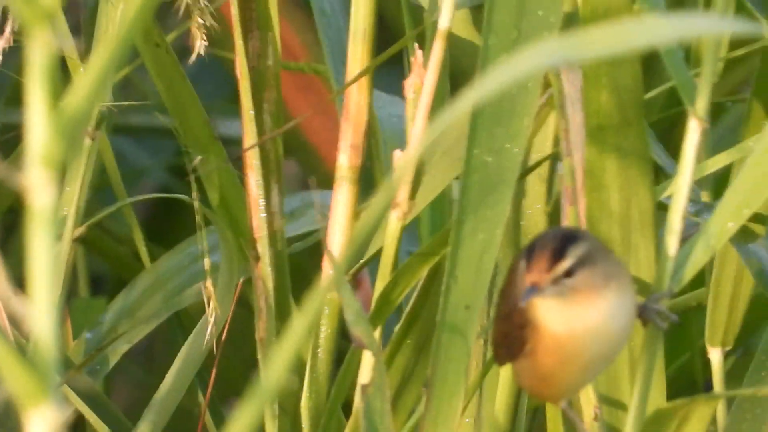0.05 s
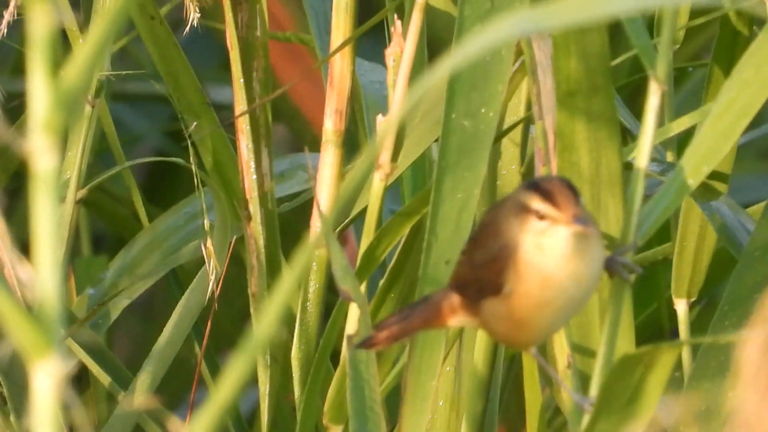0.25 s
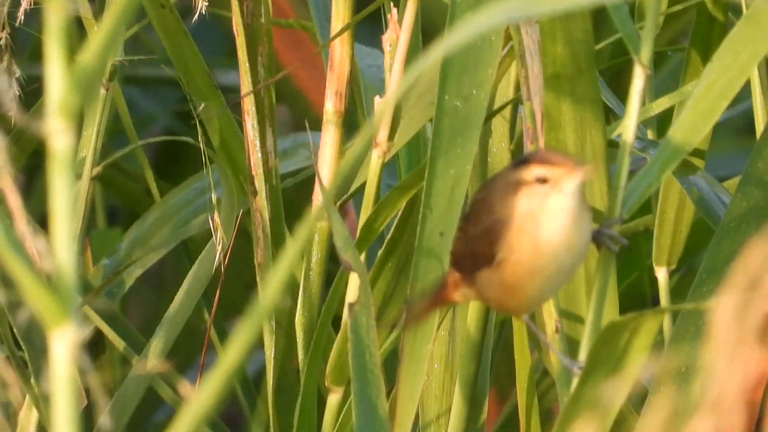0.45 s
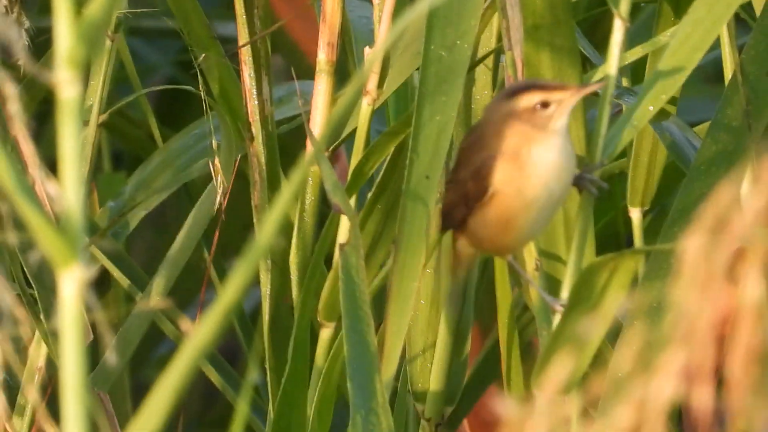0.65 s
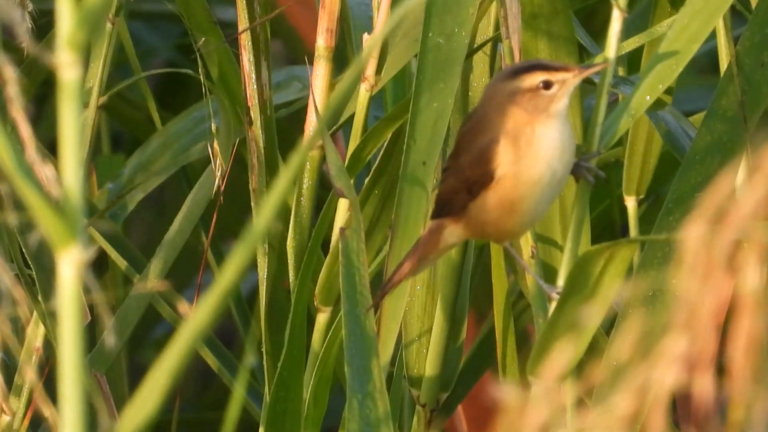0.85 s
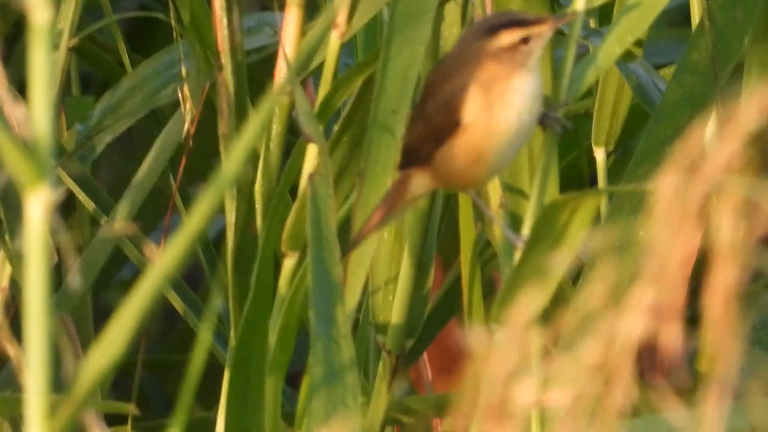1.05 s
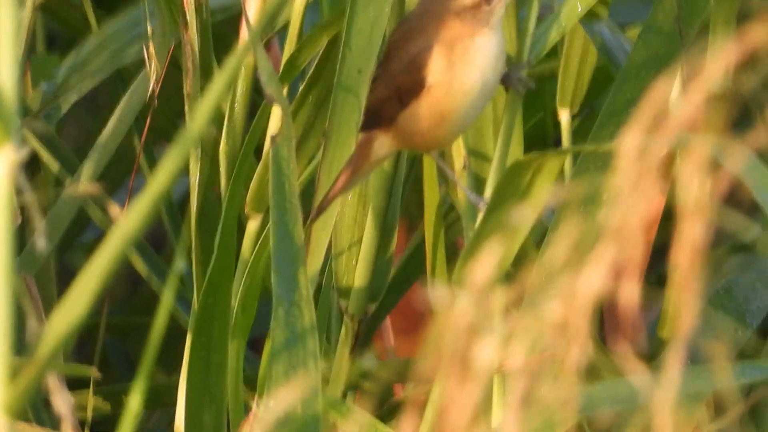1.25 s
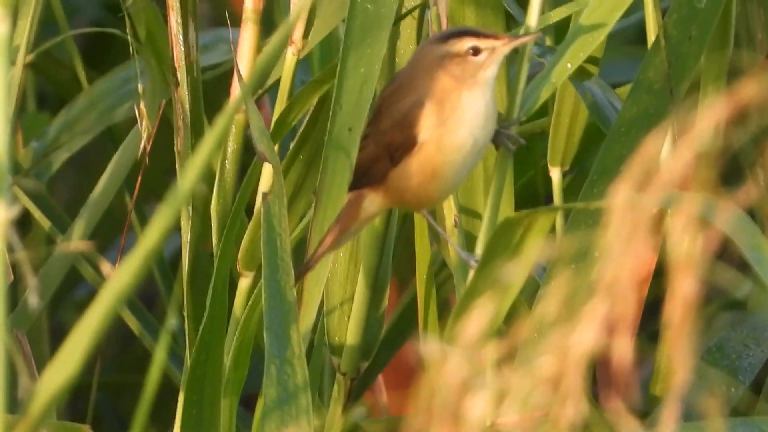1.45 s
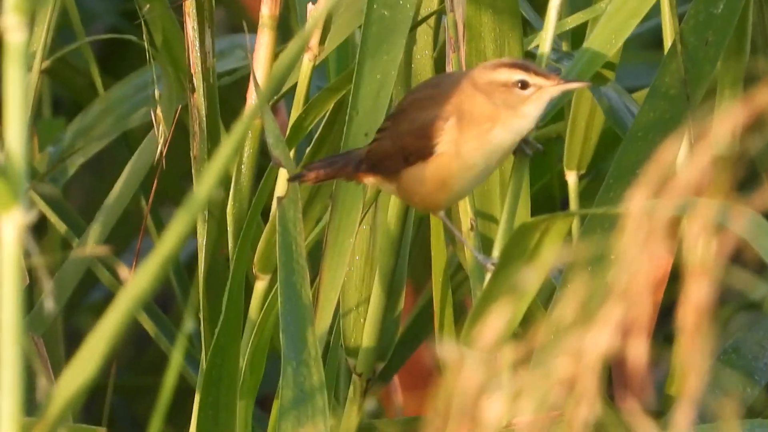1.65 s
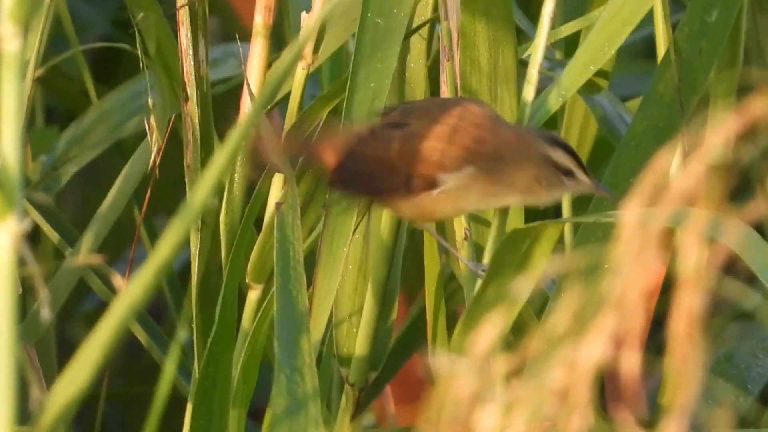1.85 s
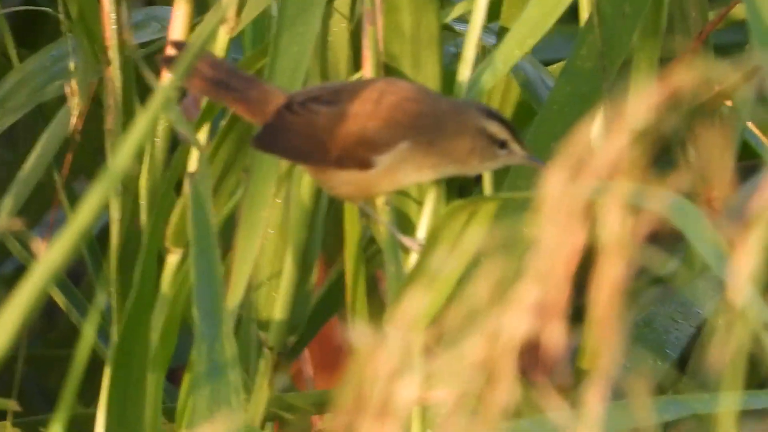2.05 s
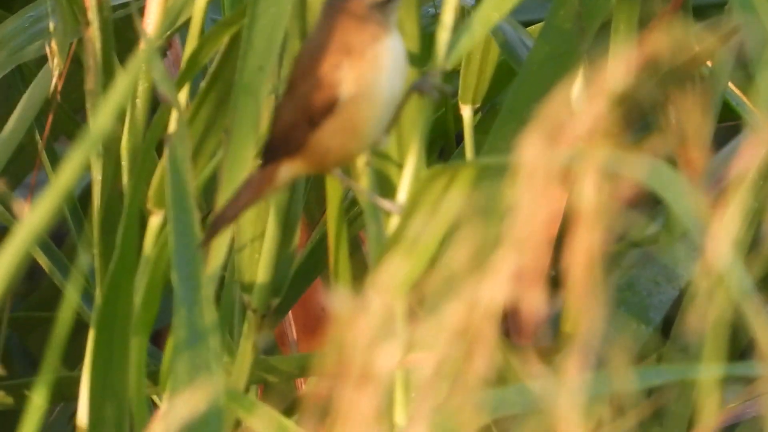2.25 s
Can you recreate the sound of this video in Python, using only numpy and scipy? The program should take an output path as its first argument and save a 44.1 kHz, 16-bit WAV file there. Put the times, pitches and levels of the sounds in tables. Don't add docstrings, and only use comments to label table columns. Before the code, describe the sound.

Close bird song in reeds: piercing paired whistles, a falling trembling glide with light stem knocks, then two quick harsh churrs. Distant birds chirp and coo softly behind, with a gentle airy insect hiss.

```python
import sys
import numpy as np
from scipy import signal
from scipy.fft import rfft, irfft, next_fast_len
from scipy.io import wavfile
from scipy.ndimage import uniform_filter1d, map_coordinates

SR = 44100
rng = np.random.default_rng(int(sys.argv[2]) if len(sys.argv) > 2 else 0)


def wav_out(sig):
    wavfile.write(sys.argv[1], SR, np.round(np.clip(np.atleast_2d(sig).T, -1, 1) * 32767).astype(np.int16))


def makeup_ratio(level_db):
    decades = np.asarray(level_db, float) / 20
    return 10 ** decades


N = 101429
T = np.arange(N) / SR


def unit(x):
    return x / np.sqrt(np.mean(x ** 2) + 1e-20)


def along(points, hz):
    f, v = np.transpose(points)
    return np.interp(np.log(hz + 1), np.log(f + 1), v)


def wobble(rate):
    return map_coordinates(rng.standard_normal(int(N * rate / SR) + 4), [T * rate])


def filtered(x, response):
    m = next_fast_len(N + 8192)
    return irfft(rfft(x, m) * response(np.fft.rfftfreq(m, 1 / SR)), m)[..., :N]


def resonant(x, peaks):
    def response(f):
        total = 0
        for k, (centre, width, db) in enumerate(peaks):
            damping = 1j * f * width
            total = total + (-1) ** k * makeup_ratio(db) * damping / (centre * centre - f * f + damping)
        return total
    return filtered(x, response)


def swell(start, length, rise):
    ramp = np.interp(T, [start, start + rise * length, start + length], [0, 1, 0])
    return np.sin(np.pi / 2 * ramp) ** 2


def placed(x, pan_db, lag, echo_db):
    # pitch_hz, t60_s
    reeds = [(500, 0.38), (2700, 0.26), (4500, 0.44), (10000, 0.18)]
    side = np.array([[.5], [-.5]])
    x = filtered(x, lambda hz: 1 / (1 + (hz / 15100) ** 4))
    direct = filtered(x, lambda hz: makeup_ratio(pan_db * side) * np.exp(2j * np.pi * hz * lag * side / SR))
    hz, t, z = signal.stft(rng.standard_normal((2, SR // 2)), SR, nperseg=256)
    tail = signal.istft(z * makeup_ratio(-60 * t / along(reeds, hz)[:, None]), SR, nperseg=256)[1]
    tail = tail / np.linalg.norm(tail[0])
    late = np.pad(x, (300, 0))[None]
    return direct + makeup_ratio(echo_db) * signal.fftconvolve(late, tail, axes=1)[:, :N]


def air_and_insects():
    # time_s, level_db
    loudness = [(0, -41), (.4, -45), (2.3, -44.5)]
    # pitch_hz, level_db (per Hz)
    colour = [(200, -12.5), (500, -16.5), (1700, -11.5), (2600, -20), (4300, -10), (6500, -20),
              (10000, -38), (15500, -58.5)]
    # pitch_hz, likeness (0-1)
    alike = [(60, 1), (250, 0.81), (1500, 0.48), (5000, 0.42), (12000, 0.25)]
    lead = 3.08
    z = signal.stft(rng.standard_normal((2, N + 512)), nperseg=512)[2]
    patches = uniform_filter1d(rng.standard_normal(z.shape[1:]), 5, 0)
    patches = uniform_filter1d(patches, 6, 1)
    pair = signal.istft(z * makeup_ratio(2.5 * unit(patches)), nperseg=512)[1][:, :N]

    def spread(hz):
        angle = np.arccos(np.clip(along(alike, hz), -1, 1)) / 2
        return makeup_ratio(along(colour, hz)) * np.array([np.cos(angle), np.sin(angle)])

    mid, side = filtered(pair, spread)
    sign = np.array([[1], [-1]])
    ports = filtered(np.array([mid + side, mid - side]), lambda hz: np.exp(1j * np.pi * hz * lead * sign / SR))
    return unit(ports) * makeup_ratio(np.interp(T, *np.transpose(loudness)) + wobble(8))


def buzz_band(hz, width):
    peak = [(hz, width, 0)]
    return unit(resonant(resonant(rng.standard_normal(N), peak), peak))


def far_birds():
    # start_s, length_s, from_hz, to_hz, level_db
    chirps = [(.24, .05, 6600, 5600, -54), (1.065, .014, 3350, 3250, -45), (1.145, .04, 3200, 2500, -51),
              (1.22, .016, 3300, 3250, -43), (1.26, .012, 3300, 2400, -49), (1.29, .04, 3150, 2300, -48),
              (1.628, .042, 4500, 2950, -43), (1.815, .03, 3700, 2750, -50), (1.84, .045, 2800, 2700, -53),
              (1.885, .02, 6600, 5800, -55), (1.9, .04, 5800, 5550, -54), (1.935, .02, 5800, 6400, -55),
              (2.02, .03, 6500, 5700, -52), (2.065, .02, 5600, 6700, -54), (2.075, .025, 7050, 7000, -53),
              (2.085, .025, 5500, 5450, -54), (2.15, .045, 4250, 4150, -52), (2.21, .04, 5000, 4750, -51),
              (2.245, .03, 4700, 4300, -52), (2.28, .02, 2700, 3000, -51), (1.96, .03, 3200, 2400, -49),
              (2.18, .035, 5200, 5050, -54)]
    # start_s, length_s, pitch_hz, level_db
    coos = [(0.707, 0.073, 440, -51.5), (0.858, 0.018, 350, -47.5), (0.869, 0.093, 710, -47.5),
            (0.897, 0.0079, 400, -39.5), (1.029, 0.043, 750, -45), (1.08, 0.12, 745, -51),
            (1.221, 0.058, 620, -50.5), (1.26, 0.058, 770, -48.5), (1.904, 0.037, 750, -44),
            (1.959, 0.081, 640, -49.5), (2.106, 0.057, 765, -43.5), (2.166, 0.054, 740, -47.5),
            (2.245, 0.037, 765, -44.5)]
    # start_s, length_s, pitch_hz, level_db, upper_hz, upper_level_db
    buzzes = [
        (.215, .07, 3700, -43, 4500, -55),
        (1.68, .08, 3620, -39, 4500, -41),
    ]
    x = 0
    for s, length, from_hz, to_hz, db in chirps:
        hz = np.interp(T, [s, s + length], [from_hz, to_hz])
        tone = np.sin(2 * np.pi * np.cumsum(hz) / SR + .8 * wobble(150))
        x = x + makeup_ratio(db - 2 + 3 * wobble(150)) * swell(s, length, 0.5) ** .5 * tone
    for s, length, hz, db in coos:
        tone = np.sin(2 * np.pi * np.cumsum(hz * (1 + .035 * wobble(60))) / SR)
        x = x + makeup_ratio(db - 1.5 + 4 * wobble(70)) * swell(s, length, .35) ** .5 * tone
    for s, length, hz, db, up_hz, up_db in buzzes:
        beat = (1 + 0.52 * np.sin(2 * np.pi * 125 * T)) * swell(s, length, 0.23) ** 0.3
        x = x + beat * (makeup_ratio(db) * buzz_band(hz, 400) + makeup_ratio(up_db) * buzz_band(up_hz, 900)) / 2
    return placed(np.sqrt(2) * x, 0.93, 0, -9)


def stems_and_leaves():
    # start_s, level_db, hollow_hz, snap_db (over the knock)
    knocks = [(0.0192, -39.5, 216, -36), (0.12, -31, 277, -11), (0.64, -27.5, 960, -32.5),
              (0.634, -27, 1350, -27), (0.67, -28, 1040, -27), (.7, -26.5, 1034, -16),
              (.79, -30.5, 763, -44), (0.69, -37, 258, -30), (0.64, -32, 2400, -21), (0.9, -33, 453, -32),
              (1.6, -34.5, 412, -30), (1.8, -37, 283, -35), (0.92, -35, 307, -32), (2.008, -38, 1650, -25),
              (1.7, -34.5, 1400, -44.5)]
    # start_s, length_s, level_db
    rustles = [
        (.15, .65, -60),
        (.67, .05, -54),
        (1.17, .06, -58),
        (1.7, .06, -59),
    ]
    # pitch_hz, level_db
    leaf_colour = [(2000, -26), (5000, -10), (8000, 11.5), (10000, 3), (14000, -19.5)]
    out = 0
    for s, db, hz, snap_db in knocks:
        t = np.clip(T - s, 0, None)
        ring = makeup_ratio(-60 * t / .045) * np.sin(2 * np.pi * hz * t + wobble(250))
        ring = ring * (1 - np.exp(-t / .002))
        snap = makeup_ratio(snap_db - 60 * t / 0.046) * rng.standard_normal(N)
        out = out + makeup_ratio(db) * (T > s) * (ring + snap)
    grains = rng.standard_normal((2, N)) * makeup_ratio(2.9 * wobble(300))
    leaf = unit(filtered(grains, lambda hz: makeup_ratio(along(leaf_colour, hz))))
    rub = sum(makeup_ratio(db) * swell(s, length, 0.32) ** .5 for s, length, db in rustles)
    return placed(out, 0, 0, -12) + leaf * rub


def churring_bird():
    # start_s, level_db, pulse_rate_hz
    calls = [
        (0.0975, -18, 786.4),
        (1.3555, -17, 812.4),
        (1.496, -17, 800.6),
    ]
    # delay_s, length_s, level_db, brightness_db
    puffs = [(.0005, 0.0057, -5, 4), (.009, .012, -5.5, -3), (.022, 0.0089, -8.5, 3),
             (0.0432, 0.0039, -7, -8.5), (0.0464, 0.0045, 2.5, 2), (.057, 0.0074, -6.5, -4.5),
             (0.064, 0.011, -2.5, -0.5), (.078, 0.0043, -7, -3.5), (.089, .005, -5.5, 6.5),
             (0.096, 0.0098, -9.5, 2.5), (0.1, 0.013, -14, -2.5)]
    # pitch_hz, width_hz, level_db
    throat = [(2390, 310, 1), (3260, 340, 3), (3900, 400, -7)]
    # pitch_hz, width_hz, level_db
    rasp = [(5570, 900, -6.5), (7830, 1030, -6.5), (11370, 1100, -19), (13700, 2200, -21)]
    # pitch_hz, width_hz, level_db
    chest_peaks = [
        [(550, 600, -18), (1460, 280, 0)],
        [(750, 600, -18), (1630, 260, 1)],
    ]
    breath = .5
    out = 0
    for s, db, hz in calls:
        cycle = np.cumsum(hz * (1 + .065 * wobble(350))) / SR
        pulses = np.diff(np.floor(cycle), prepend=0) * makeup_ratio(2 * wobble(500))
        gated = rng.standard_normal(N) * (1 + np.cos(2 * np.pi * cycle))
        source = unit((1 - breath) * unit(pulses) + breath * unit(gated))
        chest = low = high = makeup_ratio(-11) * swell(s - .012, .115 + .025, .2)
        for delay, length, level, bright in puffs:
            chest = chest + makeup_ratio(level - bright) * swell(s + delay, 1.6 * length, .3)
            low = low + makeup_ratio(level + min(bright, 0)) * swell(s + delay, 1.5 * length, .3)
            high = high + makeup_ratio(level + .6 * bright - 1) * swell(s + delay, 1.3 * length, .25)
        beak = (1 + np.tanh(2 * wobble(60) + 1)) / 2
        voice = resonant(source * chest * (1 - beak), chest_peaks[0])
        voice = voice + resonant(source * chest * beak, chest_peaks[1])
        voice = voice - resonant(source * low, throat) + resonant(source * high, rasp)
        norm = np.std(resonant(source, throat))
        out = out + placed(makeup_ratio(db - 6.5) * voice / norm, -4, -1.4, -10)
    return out


def whistle(rows, burr_hz):
    s, *cols = np.transpose(rows)
    hz, db, burr = [np.interp(T, s, c) for c in cols]
    flutter = 2 * np.pi * np.cumsum(burr_hz * (1 + .13 * wobble(220))) / SR
    phase = 2 * np.pi * np.cumsum(hz) / SR
    fall = .6 if burr_hz < 0 else .45
    comb = 0
    for k in range(4):
        sideband = np.sin(phase + (k + 1) * flutter + 1.5 * wobble(120))
        comb = comb + fall ** k * makeup_ratio(3 * wobble(200)) * sideband
    shake_db = 4 * (.4 + 2 * burr) * (np.tanh(wobble(130)) - .4)
    pure = makeup_ratio(shake_db) * np.sin(phase + 1.3 * burr * wobble(200))
    tone = (pure + .7 * burr * comb) * makeup_ratio(db + 0.5) * np.sqrt(2)
    return placed(tone * (T >= s[0]) * (T < s[-1]), -7.5, -2.1, -7)


def whistling_bird():
    # time_s, pitch_hz, level_db, burr (0-1)
    high_notes = [
        [(.092, 4520, -50, 0), (.102, 4520, -29, 0), (.12, 4490, -14, 0), (.129, 4500, -31, .1),
         (.138, 4570, -17, .4), (.157, 4600, -18, .6), (.175, 4440, -22, .4), (.192, 4350, -45, 0)],
        [(.33, 4570, -46, 0), (.348, 4540, -28, 0), (.361, 4490, -16, 0), (.369, 4500, -21, 0),
         (.382, 4530, -19, .6), (.4, 4620, -21, .8), (.417, 4420, -25, .3), (.432, 4280, -42, 0)],
    ]
    # time_s, pitch_hz, level_db, burr (0-1)
    low_notes = [
        [(.188, 2960, -45, 0), (.2, 2860, -29, 0), (.213, 2830, -19, 0), (.227, 2770, -28, 0),
         (.238, 2650, -23, 0), (.248, 2600, -35, .2), (.256, 2520, -31, .3), (.285, 2330, -46, .4)],
        [(.425, 2960, -52, 0), (.448, 2840, -28, 0), (.463, 2820, -21, 0), (.473, 2770, -31, 0),
         (.482, 2645, -23, 0), (.494, 2590, -32, .2), (.505, 2480, -35, .3), (.53, 2330, -48, .4)],
    ]
    # time_s, pitch_hz, level_db, burr (0-1)
    glide = [(.575, 4600, -44, .5), (.594, 4570, -41, .3), (.599, 4550, -23, .1), (.61, 4500, -30, .3),
             (.628, 4430, -25, .3), (.66, 4280, -28, .6), (.72, 4080, -28, .95), (.79, 3860, -27, .6),
             (.808, 3800, -31, .1), (.832, 3730, -27, 0), (.84, 3700, -16, 0), (.857, 3600, -24, 0),
             (.876, 3530, -22, .1), (.9, 3440, -42, 0)]
    # time_s, pitch_hz, level_db, burr (0-1)
    fading = [
        (0, 2168, -40, 0.0088),
        (.04, 2082, -40.5, 0.0042),
        (.07, 2115, -61, 0.0035),
    ]
    short_notes = sum(whistle(rows, 190) for rows in high_notes + low_notes + [fading])
    return short_notes + whistle(glide, -230)


def scene():
    return air_and_insects() + far_birds() + stems_and_leaves() + churring_bird() + whistling_bird()


def roll_off(x):
    return signal.sosfilt(signal.butter(12, 15820, fs=SR, output="sos"), x)


def record(dry):
    def camera(hz):
        treble = (hz < 15820) / (1 + (hz / 15300) ** 40)
        wind_cut = 0.009 + 1 / np.sqrt(1 + (171.5 / (hz + 1)) ** 10)
        return treble * wind_cut
    return roll_off(filtered(dry, camera))


dry = scene()
out = record(dry)
wav_out(out)
```